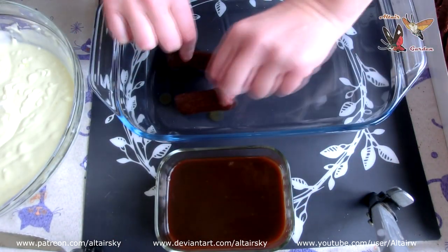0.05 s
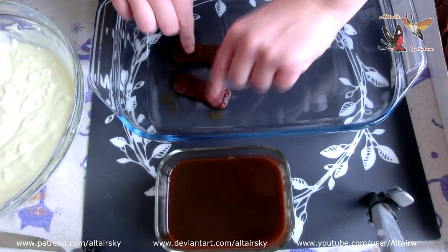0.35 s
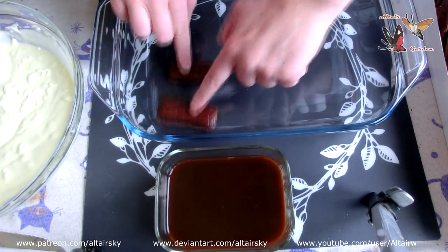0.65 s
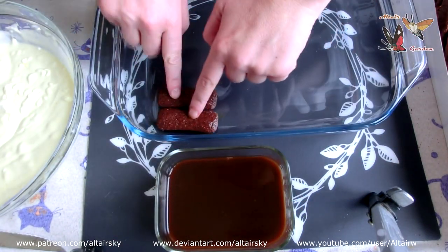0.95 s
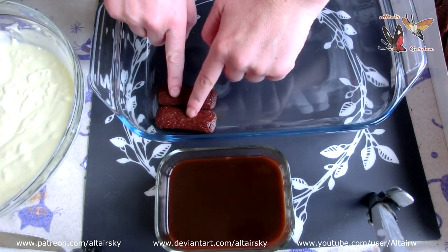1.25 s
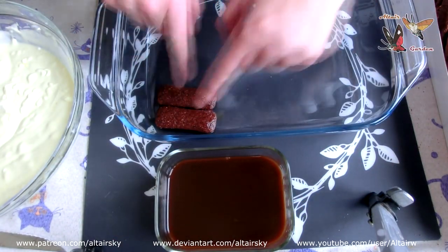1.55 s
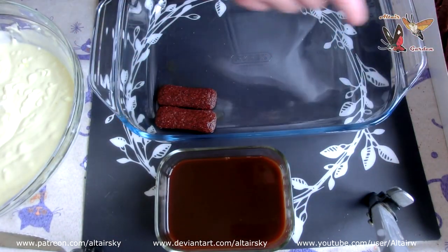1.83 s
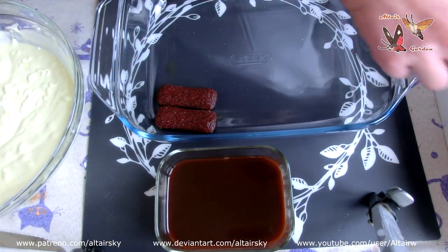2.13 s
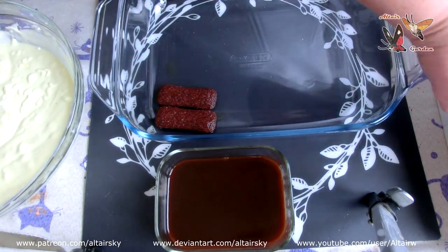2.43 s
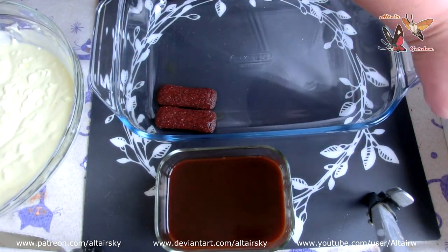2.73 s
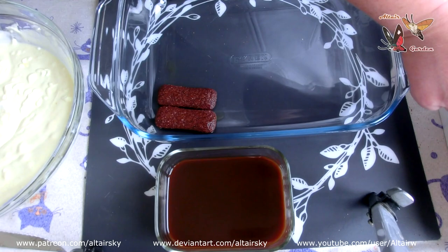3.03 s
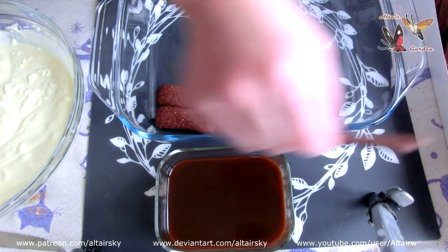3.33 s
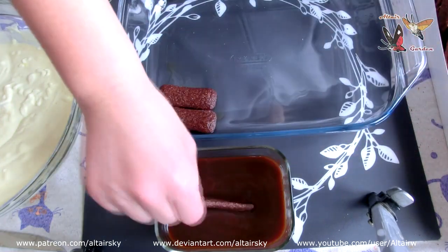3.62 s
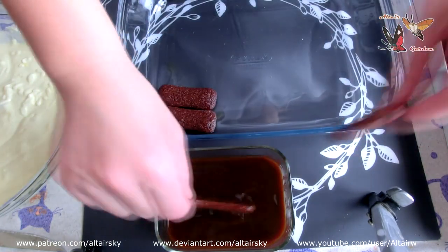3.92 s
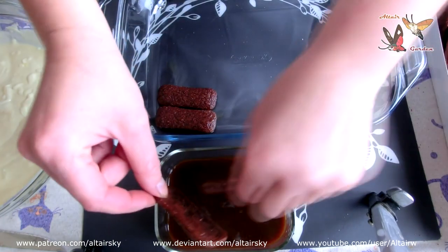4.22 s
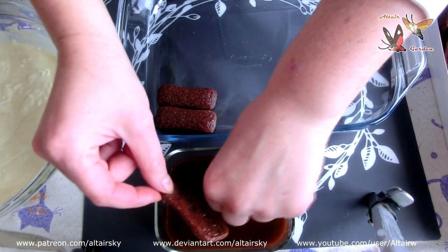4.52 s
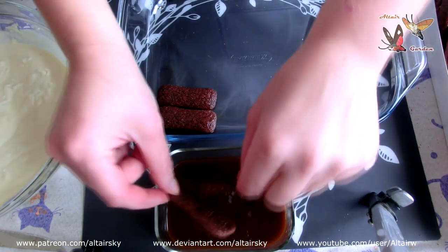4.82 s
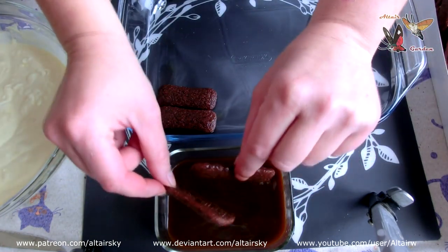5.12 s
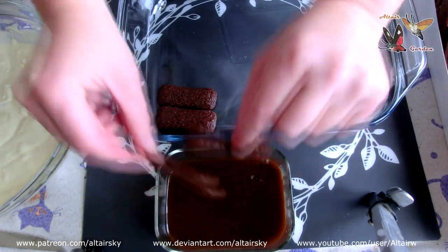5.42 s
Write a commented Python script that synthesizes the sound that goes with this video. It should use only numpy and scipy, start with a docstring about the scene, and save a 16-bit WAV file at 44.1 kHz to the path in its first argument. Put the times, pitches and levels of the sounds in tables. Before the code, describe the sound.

Biscuits knock and grate in a clinking glass dish, a packet scrapes and crinkles, then light knocks and wet ticks sound in a glass bowl.

```python
"""A glass baking dish knocks, clinks and squeaks as soaked biscuits are pushed into place:
blows ring its modes, sugary crust grates on the glass. A hand scrapes the next biscuits out of
their packet, in uneven slips along a hollow tray and a creasing wrapper, with light pings.
It dips them in a small glass bowl of coffee, with knocks, rim grazes and wet ticks.
Heard from close by in a quiet home kitchen with a faint mains hum."""
import sys
import numpy as np
from scipy import signal
from scipy.fft import rfft, irfft
from scipy.io import wavfile
from scipy.ndimage import uniform_filter1d

SR = 44100
rng = np.random.default_rng(int(sys.argv[2]) if len(sys.argv) > 2 else 0)


def materialize(psi):
    """Save the field psi as 16-bit PCM at rate SR to the path in sys.argv[1].

    A 1-D psi becomes a single channel; in a 2-D psi each row is a channel.
    """
    bounded = np.clip(np.atleast_2d(psi).T, -1, 1)
    quanta = np.round(bounded * 32767).astype(np.int16)
    wavfile.write(sys.argv[1], SR, quanta)


N = 245195
TIME_S = np.arange(N) / SR
BINS_HZ = np.fft.rfftfreq(N, 1 / SR)
RING_TIME_S = TIME_S[:SR * 3 // 4]


# blows on the dish: t/s, level/dB, hardness cutoff/Hz, f/Hz of the mode struck near its node
DISH_BLOWS = [(0.0866, -25, 1280, 817), (0.1640, -22.5, 1270, 817), (0.2940, -31.5, 2000, 1850),
              (0.3208, -20.5, 4000, 1890), (0.3268, -29, 1300, 1867), (0.3318, -19, 1400, 1867),
              (0.3802, -25, 7040, 1867), (0.9500, -40, 1400, 1000), (0.9650, -48, 1300, 1010)]
# dish on its table: f/Hz, level/dB, t60/s
DISH_MODES = [(122, -28.5, 0.7), (191, -27.5, 0.046), (303, -17, 0.024), (440, -34.5, 0.049),
              (817, -29, 0.56), (1013, -0.5, 0.042), (1001, -31, 0.19), (1319, -31, 0.99),
              (1740, -19, 0.24), (1863, -22, 0.34), (1880, 5, 0.0064), (2092, -20, 0.3), (2323, -21, 0.097),
              (2590, -22, 0.32), (2687, -14, 0.12), (2854, -19, 0.37), (3000, -44, 0.34), (3100, -23, 0.22),
              (3696, -6.5, 0.047), (3806, -13, 0.13), (3960, -27, 0.25), (4170, -23, .3), (4840, -27, 0.13),
              (5580, -20, .09), (6150, -12, 0.1), (7100, -8.5, 0.1)]

def dish_knocks():
    """Biscuits pushed into place ring the glass dish."""
    return strike(DISH_BLOWS, DISH_MODES)


# crowd of close glass modes: f/Hz, level/dB
CLINK_SPECTRUM = [(1200, -5), (2000, 8), (2600, 11), (3600, -11), (4200, -4), (4900, -24), (9000, -31)]

def dish_clink(start_s=0.38, level_db=-39, t60_s=0.36):
    """The hardest blow wakes modes too close to tell apart; they die away together."""
    envelope = np.zeros(N)
    add(envelope, start_s, amp(level_db - 60 * TIME_S[:SR] / t60_s))
    return envelope * noise(along(CLINK_SPECTRUM))


# crust on glass: t/s, level/dB, decay/s
CRUST_GRATES = [(0.0868, -44, 0.0019), (0.1562, -36.5, 0.012), (0.3212, -26.5, 0.0044),
                (0.3290, -25, 0.0048), (0.3803, -23.5, 0.0017), (0.6400, -63, .3), (0.7830, -49, .008),
                (0.7950, -42, 0.0019)]
# grating: f/Hz, level/dB
CRUST_SPECTRUM = [(200, -1), (1000, 11.5), (3500, 13), (6000, 10.5), (9000, 10.5), (12000, 6), (16000, -4)]

def crust_grating():
    """The sugary crust grates on the dish in brittle slips."""
    return slip_bursts(CRUST_GRATES, CRUST_SPECTRUM)


# squeaks: t/s, level/dB
DISH_SQUEAKS = [(0.088, -55), (0.1556, -46), (0.3216, -31.5)]

def dish_squeaks(mode_hz=8570, t60_s=0.081):
    """A corner of the dish sings briefly in one high mode under the grating."""
    out = np.zeros(N)
    for start_s, db in DISH_SQUEAKS:
        add(out, start_s, amp(db) * ring(mode_hz, t60_s))
    return out


# sharp contacts and wet ticks: t/s, level/dB, f/Hz, t60/s
CONTACT_TICKS = [(0.3203, -12, 5670, 0.0061), (0.3803, -7, 3130, 0.0036), (0.5837, -34, 3520, .0044),
                 (0.7385, -37, 1570, 0.0024), (0.7470, -38.5, 1480, .006), (0.7945, -35, 3330, .006),
                 (0.9505, -39.5, 2310, 0.0063), (0.9647, -44, 1370, 0.019), (1.0270, -37, 6300, 0.0025),
                 (4.1075, -34.5, 8200, 0.0019), (4.1346, -43, 3520, .012), (4.5470, -49.5, 12650, .007),
                 (4.5930, -36, 9100, 0.0062), (4.8550, -37.5, 7570, 0.005), (5.1950, -53.5, 4780, 0.027)]

def ticks(contacts, rise_s=0.000094, grit_octaves=0.79, grit_db=-3):
    """A contact rings briefly at its own pitch, with grit spread around that pitch."""
    out, t = np.zeros(N), TIME_S[:2048]
    bins_hz = np.fft.rfftfreq(len(t), 1 / SR) + 1
    for start_s, db, hz, t60_s in contacts:
        phasors = np.exp(2j * np.pi * rng.random(len(bins_hz)))
        rolloff = (1 + (np.log2(bins_hz / hz) / grit_octaves) ** 2) ** 1.08
        grit = unit_rms(irfft(phasors / rolloff))
        envelope = (1 - np.exp(-t / rise_s)) * amp(-60 * t / t60_s)
        tick = envelope * (np.sin(2 * np.pi * hz * t) + amp(grit_db) * grit)
        add(out, start_s, amp(db) * tick * np.linalg.norm(envelope) / np.linalg.norm(tick))
    return out


# pulls on a biscuit: t/s, length/s, scrape level/dB, tray re scrape/dB, wrapper re scrape/dB
PACKET_PULLS = [(1.99, .085, -41, 2, -10), (2.136, 0.046, -50, -1.5, -7.5), (2.421, 0.15, -44, 0.5, -6),
                (2.615, 0.038, -54.5, -1, -12), (2.687, .30, -45.5, -2, -8), (2.989, 0.13, -50.5, -2.5, -9),
                (3.14, 0.043, -55.5, -7, 3.5)]
# hollow tray: f/Hz, level/dB
TRAY_SPECTRUM = [(35, -56), (60, -16.5), (109, -6), (210, -8.5), (323, -6), (423, -5.5), (452, -5),
                 (511, 3), (561, -8), (864, -5.5), (1500, -21.5), (1950, -31), (3300, -120)]
# tray resonances: f/Hz, width/Hz, boost/dB
TRAY_PEAKS = [(122, 11, 1.5), (260, 27, 5), (312, 26, 6), (428, 27, 0.5), (560, 34, -4), (600, 27, 2.5),
              (690, 39, 5), (1100, 56, 1)]
# biscuit scraping: f/Hz, level/dB
SCRAPE_SPECTRUM = [(650, -13.5), (1100, -4.5), (1170, -8.5), (1680, -5), (1830, -9), (2110, -5),
                   (2440, -2.5), (3540, -8), (3890, -10), (4570, -11), (5550, -7.5), (6530, -30.5),
                   (7000, -18.5), (9100, -26), (15400, -120)]
# wrapper fizz: f/Hz, level/dB
FIZZ_SPECTRUM = [(3530, -35.5), (6000, 0.5), (6590, -12.5), (9380, -3), (10500, 2.5), (11500, -5),
                 (13200, -2.5), (15100, -11), (16000, -24)]

def packet_scrape(tray_db=-1, scrape_db=-1.5, fizz_db=-3, judder_db=2, judder_hz=90):
    """Biscuits drag along tray and wrapper; catching and letting go bunches the slips."""
    envelopes = np.zeros((3, N))
    for start_s, *pull in PACKET_PULLS:
        add(envelopes, start_s, pull_envelopes(*pull))
    catch = noise(-10 * np.log10(1 + (BINS_HZ / judder_hz) ** 4))
    slips = slip_train(per_s=6000, spread_db=4) * amp(judder_db * np.clip(catch, -2, 2))
    hollow_db = sum(db / (1 + (2 * (BINS_HZ - hz) / width_hz) ** 2) for hz, width_hz, db in TRAY_PEAKS)
    tray = amp(tray_db) * unit_rms(colour(slips, along(TRAY_SPECTRUM) + hollow_db))
    scrape = amp(scrape_db) * unit_rms(colour(slips, along(SCRAPE_SPECTRUM)))
    fizz = amp(fizz_db) * unit_rms(colour(slips, along(FIZZ_SPECTRUM)))
    return envelopes[0] * tray + envelopes[1] * scrape + envelopes[2] * fizz


def pull_envelopes(length_s, db, tray_db, wrapper_db):
    """A pull grips, eases and lets go; the tray swells late, the wrapper fizzes most at first."""
    grip_s, swell_s, release_s = 0.011, 0.021, 0.042
    sag_db, bite_db, bite_s = 1.5, 9, 0.0437
    t = TIME_S[:SR]
    pull = amp(db - sag_db * np.minimum(t / length_s, 1))
    release = np.exp(-np.maximum(t - length_s, 0) / release_s)
    grip = np.minimum(t / grip_s, 1)
    tray = np.minimum(t / swell_s, 1) * amp(tray_db)
    wrapper = grip * amp(wrapper_db + bite_db * np.exp(-t / bite_s))
    return pull * release * np.array([tray, grip, wrapper])


# creases: t/s, level/dB, crispness (0 dull fold, 1 bright snap)
WRAPPER_CREASES = [(2.003, -30.5, .1), (2.019, -33.5, .1), (2.036, -35.5, .1), (2.076, -35.5, .7),
                   (2.147, -46, .1), (2.175, -43.5, .6), (2.204, -51, .3), (2.4238, -33, .9),
                   (2.436, -31.5, .9), (2.503, -39.5, .1), (2.775, -40.5, .1), (3.000, -35, .8),
                   (3.112, -41, .05), (3.135, -39, .9), (3.179, -38, 1)]
# dull fold: f/Hz, level/dB
FOLD_SPECTRUM = [(300, -24), (1500, -3), (2400, 4.5), (5500, 4), (7500, -9.5), (10500, -5), (15500, -27)]
# bright snap: f/Hz, level/dB
SNAP_SPECTRUM = [(500, -12), (2500, -21), (5500, 9.5), (10500, 3.5), (14000, -0.5), (16000, -19)]

def wrapper_creases(fold_s=0.0062, snap_s=0.0013):
    """The crisper a crease, the shorter it is and the more of it is snap rather than fold."""
    start_s, db, crisp = np.transpose(WRAPPER_CREASES)
    crisp = np.clip(crisp, 0.001, 0.999)
    decay_s = fold_s + crisp * (snap_s - fold_s)
    folds = slip_bursts(zip(start_s, db + 10 * np.log10(1 - crisp), decay_s), FOLD_SPECTRUM)
    snaps = slip_bursts(zip(start_s, db + 10 * np.log10(crisp), decay_s), SNAP_SPECTRUM)
    return folds + snaps


# brushes of the hand: t/s, level/dB
PING_TOUCHES = [(2.175, -38.5), (2.204, -42), (3.112, -42), (3.150, -43)]
# brushed object: f/Hz, level/dB, t60/s
PING_MODES = [(2253, -4, 0.083), (2330, -5, 0.043), (2580, -5, 0.064)]

def pings(hardness_hz=6000):
    """The hand brushes something that rings lightly."""
    return strike([(start_s, db, hardness_hz) for start_s, db in PING_TOUCHES], PING_MODES)


# bumps on the tray: t/s, level/dB
TRAY_BUMPS = [(2.440, -49.5), (2.478, -44.5), (2.696, -45.5)]
# low tray modes: f/Hz, level/dB, t60/s
BUMP_MODES = [(263.6, -4.5, 0.33), (336, 5, 0.19)]

def tray_bumps(hardness_hz=800):
    """The hand pushes in and softly bumps the tray."""
    return strike([(start_s, db, hardness_hz) for start_s, db in TRAY_BUMPS], BUMP_MODES)


def packet_rub(start_s=1.854, length_s=0.48, fade_s=0.063, level_db=-60, hz=505, width_hz=45):
    """The hand reaches the packet: gentle friction through one hollow resonance."""
    hollow = noise(-20 * np.log10(1 + ((BINS_HZ - hz) / width_hz) ** 2))
    inside_s = np.minimum(TIME_S - start_s, start_s + length_s - TIME_S)
    return amp(level_db) * hollow * np.clip(inside_s / fade_s, 0, 1)


# blows on the bowl: t/s, ring level/dB, hardness cutoff/Hz, clack level/dB
BOWL_BLOWS = [(3.7456, -42.5, 4960, -25.5), (4.5030, -45.5, 6000, -35)]
# coffee bowl: f/Hz, level/dB, t60/s
BOWL_MODES = [(260, -0.5, 0.056), (360, -2, 0.034), (1130, -9, 0.02), (1325, -8, 0.29), (1500, -8, 0.019),
              (2140, -29.5, 0.57), (2810, -7.5, 0.08), (3600, -8, 0.057), (6620, -13, 0.1),
              (9750, -4.5, 0.046)]

def bowl_knocks():
    """Knuckles and biscuits ring the glass bowl."""
    return strike([blow[:3] for blow in BOWL_BLOWS], BOWL_MODES)


def bowl_clacks(hz=1320, t60_s=0.0043):
    """Each blow on the bowl gives a short contact clack."""
    return ticks([(start_s, db, hz, t60_s) for start_s, _, _, db in BOWL_BLOWS])


# grazes: t/s, level/dB, f/Hz, spread/octaves
RIM_GRAZES = [(4.1078, -53.5, 8600, 0.77), (4.1365, -40.5, 3520, 0.23), (5.1080, -58, 5300, .15),
              (5.1960, -67, 6500, .15), (5.2240, -54.5, 7560, 0.28)]
# bowl rim: f/Hz, level/dB, t60/s
RIM_MODES = [(2900, -12, 0.3), (3514, -1.5, 0.16), (5300, -2, .03), (6600, 0, 0.14), (8000, -6, 0.069),
             (11200, 1, .06)]

def rim_grazes():
    """A biscuit grazes the bowl's rim and wakes the modes near one pitch."""
    out = np.zeros(N)
    mode_hz, rings = mode_bank(RIM_MODES)
    for start_s, db, hz, octaves in RIM_GRAZES:
        add(out, start_s, amp(db) * bell(mode_hz, hz, octaves) @ rings)
    return out


# room decay: f/Hz, t60/s
TAIL_DECAY = [(150, 0.64), (500, 0.54), (1400, 0.85), (3500, 0.53), (7000, 0.49), (14000, 0.29)]
# room tail: f/Hz, level/dB
TAIL_SPECTRUM = [(100, -11), (400, 3), (1200, -9), (3000, -4.5), (6000, -8), (14000, -4.5)]

def kitchen(x, tail_db, table_db, table_s=0.0034, gap_s=0.0015, echoes_per_s=4000, alike_hz=4800):
    """Quick echoes off the table top, then the room's tail, its bass alike in both channels."""
    t = RING_TIME_S
    echoes = rng.choice([-1., 1.], (2, len(t)))
    echoes *= (rng.random(echoes.shape) < echoes_per_s / SR) * (t > gap_s)
    hz, frame_s, spectra = signal.stft(echoes, SR, nperseg=256)
    hz = hz[:, None]
    spectra = correlate(spectra, 1 / (1 + (hz / alike_hz) ** 2))
    spectra *= amp(along(TAIL_SPECTRUM, hz) - 60 * frame_s / along(TAIL_DECAY, hz))
    tail = signal.istft(spectra, SR, nperseg=256)[1][:, :len(t)]
    table = echoes[0] * np.exp(-t / table_s)
    response = amp(tail_db) * tail / np.linalg.norm(tail[0])
    response += amp(table_db) * table / np.linalg.norm(table)
    return x + signal.fftconvolve(x, response, axes=1)[:, :N]


# air noise: f/Hz, level/dB
AIR_SPECTRUM = [(12, -9), (20, -9.5), (44, 0.5), (86, -1.5), (123, -9), (146, -2), (301, -5.5), (328, -6),
                (357, -9.5), (542, -6), (1570, -18.5), (4670, -21.5), (5850, -22.5), (6540, -22),
                (16000, -27)]
# air noise: f/Hz, left-right correlation
AIR_LIKENESS = [(30, 0.4), (120, 0), (300, 0.45), (700, 0.7), (1500, 0.12), (3000, 0.07), (15000, 0)]

def room_tone(left_db=-57.9, right_db=-58.7, hum_hz=120, hum_db=-68):
    """Steady air noise, hiss and mains hum."""
    air = colour(rng.standard_normal((2, N)), along(AIR_SPECTRUM))
    air = unit_rms(irfft(correlate(rfft(air), along(AIR_LIKENESS)), N))
    hum = amp(hum_db) * np.sin(2 * np.pi * hum_hz * TIME_S)
    return amp([[left_db], [right_db]]) * air + hum


def strike(blows, modes, rise_s=0.0008, node_db=-2, node_octaves=0.085):
    """Blows ring an object; soft contact leaves high modes quiet, a blow near a node that mode."""
    out = np.zeros(N)
    mode_hz, rings = mode_bank(modes)
    rings *= 1 - np.exp(-RING_TIME_S / rise_s)
    signs = (-1) ** np.arange(len(modes))
    for start_s, db, hardness_hz, *nodes_hz in blows:
        dip_db = sum(node_db * bell(mode_hz, hz, node_octaves) for hz in nodes_hz)
        gains = amp(db + dip_db) / np.hypot(1, (mode_hz / hardness_hz) ** 2)
        add(out, start_s, (signs * gains) @ rings)
    return out


def mode_bank(modes):
    """Frequencies and ringing waveforms of an object's modes."""
    return np.array(modes)[:, 0], np.array([amp(db) * ring(hz, t60_s) for hz, db, t60_s in modes])


def ring(hz, t60_s):
    """One decaying mode."""
    return np.sin(2 * np.pi * hz * RING_TIME_S) * amp(-60 * RING_TIME_S / t60_s)


def slip_bursts(bursts, spectrum):
    """Runs of brittle slips that start at once and fade."""
    envelope = np.zeros(N)
    for start_s, db, decay_s in bursts:
        add(envelope, start_s, amp(db) * np.exp(-(TIME_S[:SR // 2] / decay_s) ** 1.04))
    return envelope * unit_rms(colour(slip_train(per_s=16000, spread_db=4.8), along(spectrum)))


def slip_train(per_s, spread_db):
    """Tiny slips of random size and sign."""
    sizes = amp(spread_db * np.minimum(rng.exponential(1, N), 4))
    signs = rng.choice([-1., 1.], N)
    return unit_rms(sizes * signs * (rng.random(N) < per_s / SR))


def mic_ports(x, scatter_hz, right_lead_s=0):
    """Two ports share the bass; their housing scatters the treble phases apart."""
    wobble = unit_rms(uniform_filter1d(rng.standard_normal(len(BINS_HZ)), size=3000))
    phase = wobble * BINS_HZ / scatter_hz + 2 * np.pi * BINS_HZ * right_lead_s
    return np.array([x, irfft(rfft(x) * np.exp(1j * phase), N)])


def correlate(channels, likeness):
    """Gives two independent channels a set correlation."""
    left, right = channels
    return np.array([left, likeness * left + np.sqrt(1 - likeness ** 2) * right])


def noise(gain_db):
    """Coloured noise at rms 1."""
    return unit_rms(colour(rng.standard_normal(N), gain_db))


def colour(x, gain_db):
    """Filters by a gain per bin."""
    return irfft(rfft(x) * amp(gain_db), N)


def along(points, hz=BINS_HZ):
    """Reads a table on a log-frequency axis."""
    point_hz, values = np.transpose(points)
    return np.interp(np.log(hz + 1), np.log(point_hz + 1), values)


def bell(hz, centre_hz, octaves):
    """Gaussian weight around a pitch."""
    return np.exp(-(np.log2(hz / centre_hz) / octaves) ** 2)


def amp(db):
    """Decibels to gain."""
    return 10 ** (np.asarray(db) / 20)


def unit_rms(x):
    """Scales to rms 1."""
    return x / np.sqrt(np.mean(x ** 2) + 1e-20)


def add(mix, start_s, sound):
    """Mixes a sound in at start_s."""
    part = mix[..., round(start_s * SR):][..., :sound.shape[-1]]
    part += sound[..., :part.shape[-1]]


# port balance: f/Hz, left minus right/dB
STEREO_TILT = [(100, 1.5), (1000, 2.5), (3000, 0.8), (6000, 4), (9000, 6.5), (14000, 10)]

def scene():
    """Dish and bowl ahead, packet to the right; the left port is the brighter one."""
    dish = dish_knocks() + dish_clink() + crust_grating() + dish_squeaks()
    packet = packet_scrape() + wrapper_creases() + pings() + tray_bumps() + packet_rub()
    mix = kitchen(mic_ports(dish, scatter_hz=11000), tail_db=-8.5, table_db=-43.5)
    contacts = ticks(CONTACT_TICKS) + bowl_clacks()
    mix += kitchen(mic_ports(contacts, scatter_hz=11000), tail_db=-8.5, table_db=-15.5)
    mix += kitchen(mic_ports(bowl_knocks(), scatter_hz=12000), tail_db=-7, table_db=-3.5)
    mix += kitchen(mic_ports(rim_grazes(), scatter_hz=12000), tail_db=-10, table_db=-8)
    mix += kitchen(mic_ports(packet, scatter_hz=8400, right_lead_s=18e-6), tail_db=-8.5, table_db=-13)
    balance_db = np.array([[0.5], [-0.5]]) * along(STEREO_TILT)
    return colour(mix, balance_db) + room_tone()


def record(dry):
    """Steep low-pass band limit."""
    cutoff_hz = 15700
    lowpass = signal.firwin(255, cutoff_hz, window=("kaiser", 9), fs=SR)
    return signal.oaconvolve(dry, lowpass[None], "same")


dry = scene()
out = record(dry)
materialize(out)
```